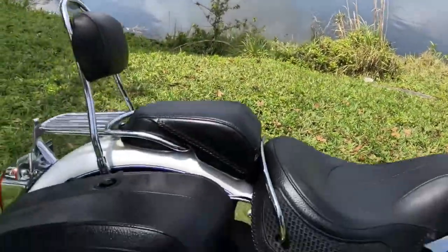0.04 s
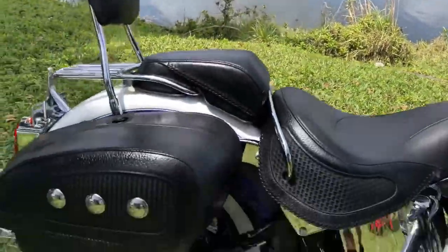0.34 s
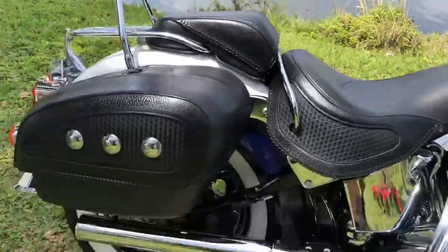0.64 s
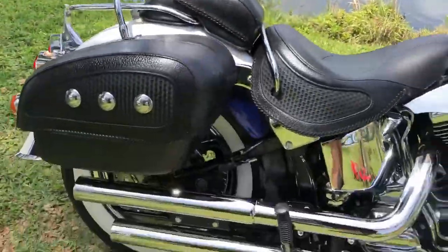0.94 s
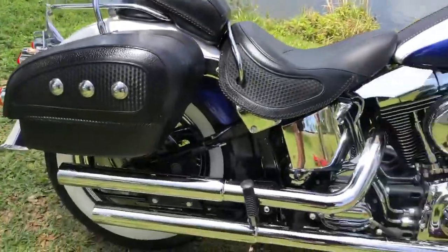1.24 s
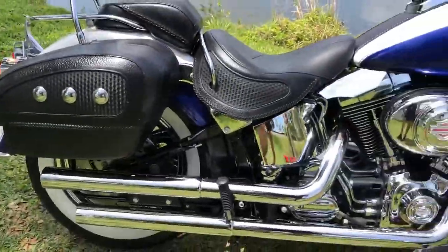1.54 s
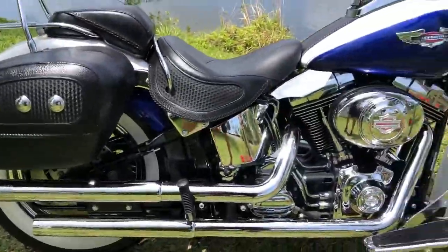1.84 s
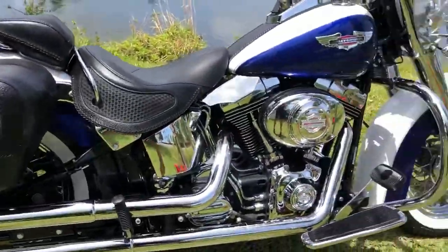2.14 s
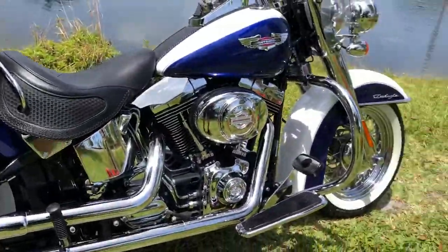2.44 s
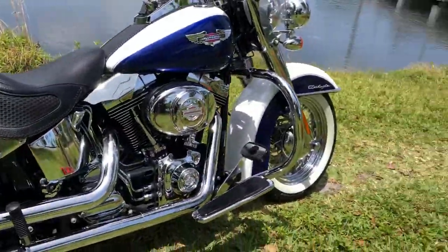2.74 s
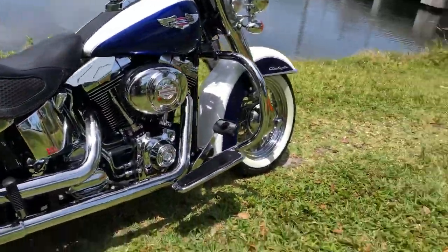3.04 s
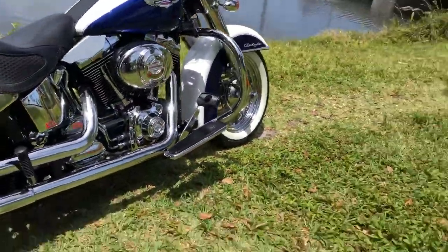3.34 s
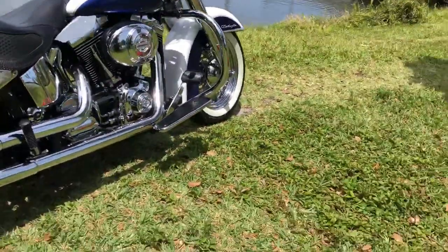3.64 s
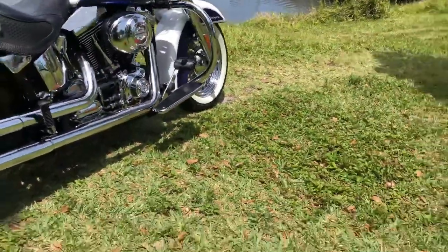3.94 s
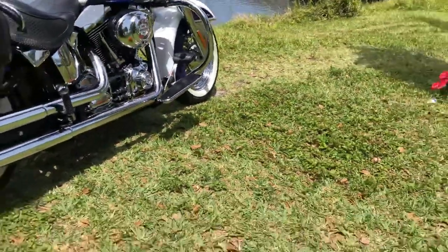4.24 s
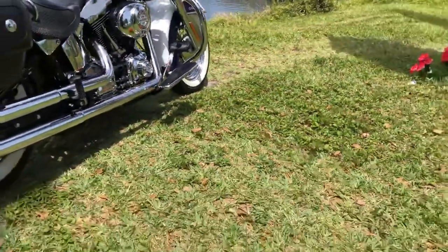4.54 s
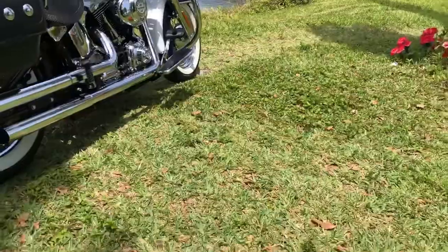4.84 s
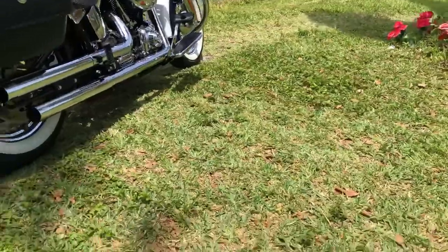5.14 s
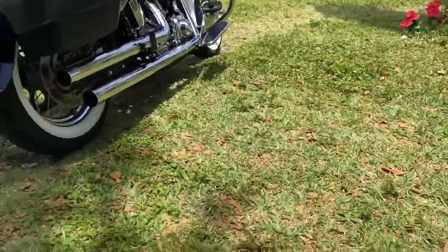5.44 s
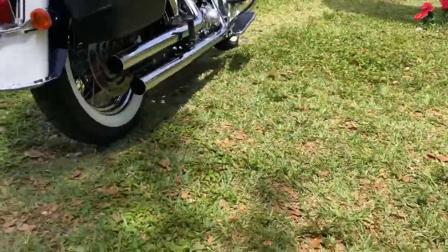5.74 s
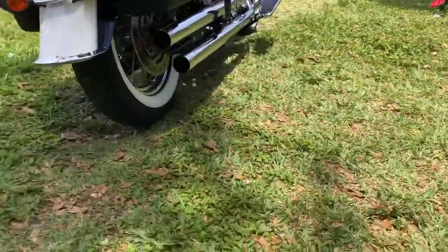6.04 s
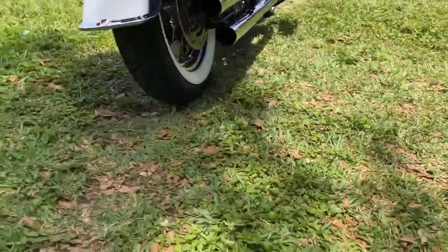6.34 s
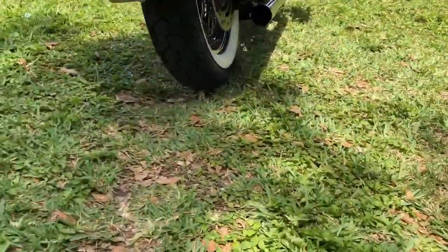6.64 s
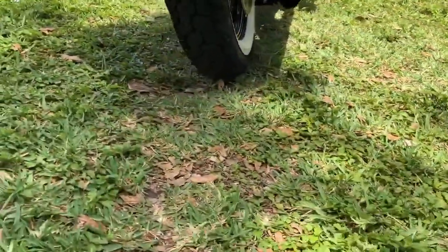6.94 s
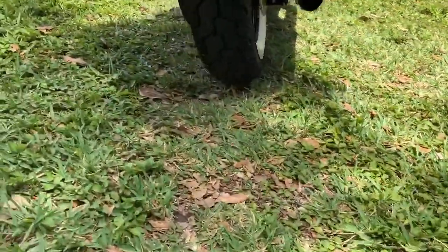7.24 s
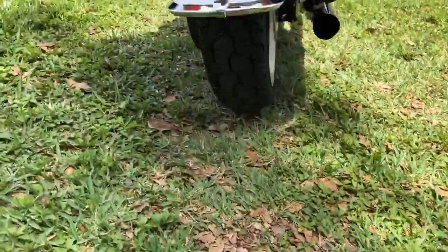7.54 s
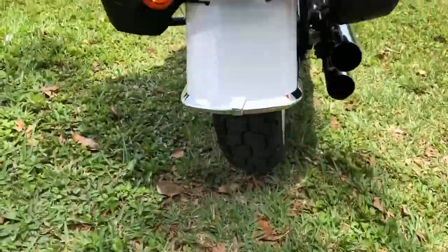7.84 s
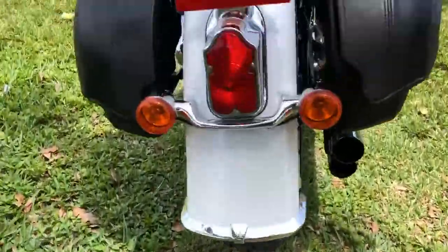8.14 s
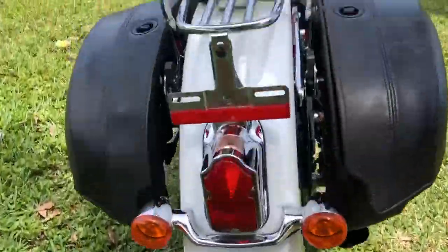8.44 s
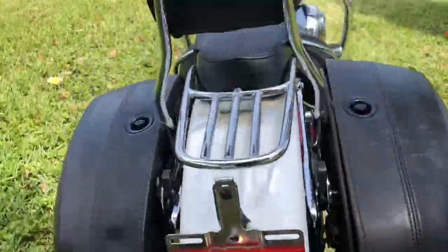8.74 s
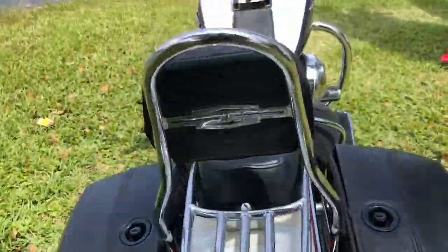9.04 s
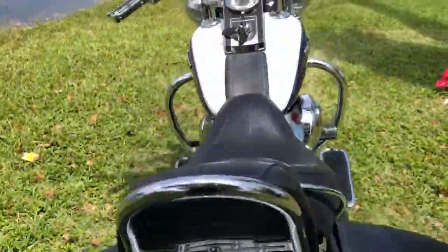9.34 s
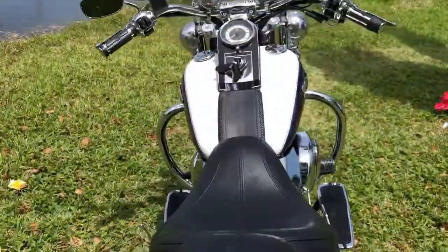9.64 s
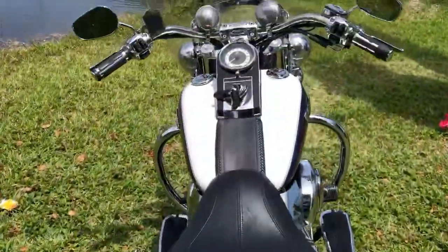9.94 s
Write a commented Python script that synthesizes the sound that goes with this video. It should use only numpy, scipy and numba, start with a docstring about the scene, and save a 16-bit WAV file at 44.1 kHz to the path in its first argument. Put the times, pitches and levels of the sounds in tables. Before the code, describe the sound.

Loud, uneven motorcycle exhaust booms and cracks, skipping beats as the engine slows to a throbbing idle with light mechanical clatter.

```python
"""An air-cooled V-twin motorcycle with two open pipes runs fast and ragged just after starting,
skips firings, then settles to a loping idle. Each firing sets its own pipe booming and throws out a
barking, cracking puff of gas. The valve gear clatters underneath and gulped air adds a hollow honk.
The microphone is carried over grass along the side of the bike, past the pipe mouths, where a rush
of exhaust brushes it, and up behind the seat."""
import sys
import numpy as np
from scipy import signal
from scipy.fft import rfft, irfft
from scipy.io import wavfile
from numba import njit

SR = 44100
rng = np.random.default_rng(int(sys.argv[2]) if len(sys.argv) > 2 else 0)


def store_pcm(level_fs):
    """Save levels as 16-bit WAV."""
    pcm = np.round(np.clip(level_fs, -1, 1) * 32767).astype(np.int16)
    wavfile.write(sys.argv[1], SR, np.atleast_2d(pcm).T)


N = 440559
TIME = np.arange(N) / SR


def undb(db):
    """Turn decibels into a number to multiply by."""
    return 10 ** (np.asarray(db) / 20)


def curve(rows):
    """Join a table's rows with straight lines in time, giving one curve for each value column."""
    seconds, *columns = np.transpose(rows)
    return [np.interp(TIME, seconds, column) for column in columns]


def levels_at(times, rows):
    """Look up a table's values at the given times, one row for each."""
    return np.transpose([np.interp(times, TIME, level) for level in curve(rows)])


def colour(x, points, size=2048):
    """Make some pitches stronger and others weaker; white noise keeps its overall power."""
    hz, db = np.transpose(points)
    freqs = np.maximum(np.arange(size // 2 + 1) * SR / size, 1)
    gains = undb(np.interp(np.log(freqs), np.log(hz), db))
    # these steps make the filter ring only after a sound, never before it
    cepstrum = irfft(np.log(gains))
    cepstrum[1:size // 2] *= 2
    cepstrum[size // 2 + 1:] = 0
    response = irfft(np.exp(rfft(cepstrum)))
    return signal.oaconvolve(x, response / np.linalg.norm(response))[:N]


def low_pass(order, hz):
    """Design a filter that dulls the sound above hz."""
    return signal.butter(order, hz, fs=SR, output="sos")


def resonance(x, hz, width_hz):
    """Ring at one pitch; a smaller width rings longer."""
    return signal.lfilter(*signal.iirpeak(hz, hz / width_hz, fs=SR), x)


@njit
def glide(x, hz, width_hz):
    """A resonance whose pitch and width move over time."""
    y, band, low = np.empty(len(x)), 0., 0.
    for i in range(len(x)):
        tuning, damping = np.tan(np.pi * hz[i] / SR), width_hz[i] / hz[i]
        ring = (band + tuning * (x[i] - low)) / (1 + tuning * (tuning + damping))
        band, low = 2 * ring - band, low + 2 * tuning * ring
        y[i] = damping * ring
    return y


def puffs(times, db, rise_s, hold_s, fall_s, tail_db, tail_s, patchy_db=0, size=4096):
    """Bursts of noise, each with its own tone: it swells, holds, collapses and leaves a weak tail."""
    t = TIME[:size]
    after = np.maximum(t - rise_s - hold_s, 0)
    tail = undb(tail_db) * np.exp(-after / tail_s)
    shape = np.minimum(t / rise_s, 1) * (np.exp(-after / fall_s) + tail)
    bumps = signal.resample(rng.standard_normal((len(times), 56)), size // 2, axis=1)
    spectra = rng.standard_normal((len(times), size)).view(complex) * undb(patchy_db * bumps)
    bursts = irfft(spectra, size) * shape
    bursts *= (undb(db) * np.linalg.norm(shape) / np.linalg.norm(bursts, axis=1))[:, None]
    out = np.zeros(N + size)
    for start, burst in zip(np.clip(times * SR, 0, N).astype(int), bursts):
        out[start:start + size] += burst
    return out[:N]


# The engine flares once, sinks, then wavers round its idle.
# Each row: time in seconds, turns per minute.
ENGINE_SPEED = [(0.0, 2206.6), (0.32, 1719.2), (0.58, 2451.0), (0.91, 1819.8), (1.44, 1326.7),
                (2.18, 1239.2), (3.03, 1269.2), (3.24, 1215.1), (3.68, 1312.6), (3.81, 1218.6),
                (4.43, 1182.3), (5.34, 1229.5), (5.53, 1162.5), (5.74, 1185.9), (6.01, 1108.0),
                (6.39, 1161.8), (6.8, 1110.2), (7.14, 1170.8), (7.86, 1090.1), (7.97, 1162.0),
                (8.14, 1106.5), (8.53, 1146.1), (8.6, 1121.2), (9.39, 1149.4), (9.64, 1035.7),
                (10.0, 1169.7)]
def speed_ratio(idle_rpm=1200):
    """How fast the engine turns: 1 is idle, 2 is twice as fast."""
    return curve(ENGINE_SPEED)[0] / idle_rpm


def crank_times(place, first_firing=.794):
    """When the crank passes a place (0 to 1) in its two-turn cycle; the front cylinder fires at 0."""
    cycles = np.cumsum(curve(ENGINE_SPEED)[0]) / (2 * 60 * SR) - first_firing - place
    return np.interp(np.arange(np.ceil(cycles[0]), cycles[-1]), cycles, TIME)


# The microphone's path. Each row: time in seconds, facing the pipe mouths from 0 to 1,
# delay of the ground echo in milliseconds.
WALK = [(0, 0.07, 0.67), (.9, 0.34, 1.1), (1.4, 0.25, 1.15), (2.3, 0.27, 1.66), (4.5, .47, 1.28),
        (5.5, 0.39, 1.8), (7.3, 1, 1.96), (8.5, .62, 1.34), (10, 0.36, 2.43)]
def facing_pipes():
    """Where the microphone is: 0 beside the bike, 1 straight behind the pipe mouths."""
    return curve(WALK)[0]


# Valves shutting. Each row: place in the cycle from 0 to 1, level in dB.
VALVES = [(0.281, -38.5), (.7, -35.5)]
# The ticks are clearer above the cylinder heads. Each row: time in seconds, boost in dB.
TICK_BOOST = [(0, -2), (3, -2.5), (8.4, -5), (9, 2), (10, 3)]
# The tone of a tick and of the whirr. Each row: pitch in Hz, relative level in dB.
TICK_TONE = [(800, -33), (1800, 6), (3000, 7), (3800, 1), (5500, -3), (8500, -16), (12000, -12),
             (15500, -22)]
WHIRR_TONE = [(25, -31), (100, -24), (250, 8.5), (400, -0.5), (700, 0.5), (1200, -6), (2000, -7),
              (3000, -10), (5000, -11), (7000, -14.5), (11000, -21.5), (15500, -29)]
# Cooling fins and rocker covers ring. Each row: pitch in Hz, width in Hz, boost in dB.
FIN_NOTES = [(461, 16, 10), (1193, 14, 16), (1400, 65, -1), (2925, 28, 3), (3800, 75, 0), (4860, 290, -4)]
def clatter(idle_db=-2, db_per_doubling=10, behind_db=-8):
    """Gears and chain whirr, valves tick shut, and both ring the fins; more speed is louder."""
    ticks = 0
    for place, db in VALVES:
        times = crank_times(place)
        ticks += puffs(times, db + 2 * rng.standard_normal(len(times)),
                       rise_s=.001, hold_s=.002, fall_s=.004, tail_db=-24, tail_s=.012, patchy_db=2)
    whirr = undb(-37.5) * colour(rng.standard_normal(N), WHIRR_TONE)
    shake = whirr + undb(curve(TICK_BOOST)[0]) * colour(ticks, TICK_TONE)
    fins = sum(undb(db) * resonance(shake, hz, width) for hz, width, db in FIN_NOTES)
    level_db = idle_db + db_per_doubling * np.log2(speed_ratio()) + behind_db * facing_pipes()
    return undb(level_db) * (shake + fins)


# An ordinary firing. Each row: time in seconds, then relative boom, bark and crack levels in dB.
FIRING_LEVELS = [(0, 0, -22.5, -29), (.3, -4, -22, -32), (.45, -5.5, -21.5, -20.5), (.6, -1.5, -16.5, -29),
                 (1, -1.5, -19, -29.5), (1.2, -2.5, -17.5, -25.5), (2.5, -1, -19, -24.5),
                 (3.7, 1, -19.5, -23.5), (4.2, 0, -27, -19.5), (4.7, 1.5, -23, -18), (5.5, 1.5, -21, -14),
                 (6.3, 3, -23.5, -11), (7.2, 3.5, -25.5, -14.5), (8.45, 4.5, -23.5, -10.5),
                 (8.9, 4.5, -19.5, -17), (10, 3, -30, -33)]
# Added for the rear pipe. Each row: time in seconds, then boom, bark and crack changes in dB.
REAR_CHANGES = [(0, -0.5, 3, -5), (1.5, -3.5, -1, -3.5), (7, -4, 1.5, -1.5), (9, -5, -2, 1),
                (10, -7, -2.5, 3.5)]
# Weak firings (nearly all in the rear cylinder) and hard ones (most while the engine races).
# Each row: time in seconds, boom change in dB, gas noise change in dB.
MISFIRES = [(.05, -16, -0.5), (.59, -4, -13), (.608, -0.5, 0), (.655, -15, -5), (.8, -9, -2),
            (.925, -8, -8), (1.016, -6, -20), (1.06, -6, -9), (1.24, -2.5, -8), (1.41, -6, -16),
            (1.59, -8, -29), (1.775, -4, -7), (2.06, -11, -19), (2.25, -8, -22), (2.44, 0, -6.5),
            (3.11, -7, -22), (3.4, -13, -34), (3.59, -6, -21), (3.78, -9, -13), (3.975, -5.5, -23),
            (4.17, -6, -17.5), (4.58, -8, -22), (4.78, -1.5, -7), (4.98, -9, -37), (5.18, -9, -20),
            (5.37, -7, -15.5), (8.11, -2, -25), (8.53, -3, -7), (8.745, -6.5, -22)]
BANGS = [(.096, 0, 6), (.185, 0, 7), (.22, 3, 6), (.357, 4, 5), (.386, 4.5, 8.5), (.422, 2, 9.5),
         (.447, 2.5, 6.5), (.477, 4, 7), (.5, 5.5, 4), (.627, 1.5, 3), (.687, 0, 0.5), (.736, -4, 3),
         (.855, 3, 4.5), (1.162, -1.5, 3.5), (2.4, 2, 3), (4.275, 3, 5.5), (4.68, 2, 5.5), (8.91, 0, -0.5)]
def cylinder_firings(rear_lag_cycles=.428, idle_jitter_s=.0003, bark_share=.83):
    """List front and rear firings. Each row: start in seconds, then boom, bark and crack in dB."""
    front, rear = crank_times(0), crank_times(rear_lag_cycles)
    times = np.concatenate([front, rear])
    chance = rng.standard_normal((len(times), 4))
    scatter_db = np.array([.5, 1.6, .9])  # boom, bark, crack
    db = levels_at(times, FIRING_LEVELS) + scatter_db * chance[:, 1:]
    db[len(front):] += levels_at(rear, REAR_CHANGES)
    for when, boom_db, gas_db in MISFIRES + BANGS:
        nearest = np.argmin(abs(times - when))
        db[nearest] += boom_db, bark_share * gas_db, gas_db
    # the faster the cold engine runs, the more unevenly it fires
    ragged = np.interp(times, TIME, speed_ratio()) ** 3.6
    starts = times + idle_jitter_s * ragged * chance[:, 0]
    return np.split(np.column_stack([starts, db]), [len(front)])


# The notes of the air in each pipe. Each row: pitch at idle in Hz, width at idle in Hz,
# boost in dB, direction of the swing at the mouth (1 or -1).
FRONT_PIPE = [(70.27, 26.87, 19.5, 1), (77.2, 54.46, 18, -1), (95.9, 17.3, 5, 1), (144.54, 46.7, 13.5, 1),
              (153.24, 29.3, 11, -1)]
REAR_PIPE = [(74.33, 27.45, 17, 1), (75.5, 14.9, 20, -1), (132.6, 16.5, 4, -1), (168.3, 5.2, 3, 1),
             (221.2, 30.14, 11.5, -1), (221.5, 23.6, 13, 1)]
def boom(firings, notes, lead_s, gain_db):
    """The opening valve pushes the air in the pipe, which rings at its own low notes."""
    times, boom_db, _, _ = np.transpose(firings)
    starts = np.clip((times - lead_s) * SR, 0, N - 1).astype(int)
    kicks = np.bincount(starts, undb(boom_db + gain_db), N)
    # the valve lifts gradually, so the push is soft
    push = signal.sosfiltfilt(low_pass(2, hz=700), kicks, padtype=None)
    heat = speed_ratio() ** .234  # faster running heats the gas, which raises the notes
    return sum(sign * undb(db) * glide(push, hz * heat, width * heat) for hz, width, db, sign in notes)


# The tone of the gas noises, with bark and crack heard from the side and from behind the pipes.
# Each row: pitch in Hz, relative level in dB.
GROWL_TONE = [(30, -61), (90, -16.5), (170, 3), (235, 3.5), (300, -4), (400, -14.5), (600, -12),
              (1000, -13), (2500, -54)]
BARK_SIDE = [(200, 10.5), (380, -5), (520, -1), (720, 5), (950, 6), (1200, -0.5), (1450, -1), (1950, 2),
             (2400, -10), (3200, -17), (6000, -15.5), (14000, -16.5)]
BARK_BEHIND = [(200, -4.5), (380, -17), (520, 12), (720, -0.5), (1050, 8), (1300, 4), (1600, 9), (2100, 0),
               (3200, -5), (6000, -25)]
CRACK_SIDE = [(1000, -58.5), (2000, 2), (2900, 8), (4000, 6.5), (5200, 1.5), (6500, -2), (9000, 3.5),
              (12000, -0.5), (15500, -9.5)]
CRACK_BEHIND = [(1000, -10), (2400, -10), (3400, 2), (4500, 1.5), (6500, 1), (9000, 1), (10500, -2.5),
                (12500, -7), (15500, -15)]
# The bark's strongest ring along the way. Each row: time in seconds, pitch in Hz, boost in dB.
BARK_RING = [(0, 970, -16), (.5, 1240, 9.5), (.75, 1460, 7), (1.3, 1190, 3.5), (2.3, 1196, 6.5),
             (3.5, 1110, -21), (4.3, 1780, 5.5), (4.9, 1650, 2), (5.6, 1340, -1), (7.4, 1050, -23),
             (8.8, 970, -3), (9.5, 1180, 9.5)]
# The low growl and the highest fizz rise and fall. Each row: time in seconds, boost in dB.
GROWL_BOOST = [(0, -2), (3.2, -7.5), (4.1, -0.5), (5.5, -2), (8.15, 3.5), (8.5, -12.5), (10, -6)]
FIZZ_BOOST = [(0, -10), (.8, -5.5), (2.3, 0.5), (3.5, 0), (4.7, -1.5), (5.5, -4), (7.3, 3), (8.15, -1.5),
              (8.5, -12), (10, 1)]
def gas_jet(firings, bark_db, crack_db, snap_db):
    """Gas shoots from one pipe: a low growl, a bark and a bright crack that beams out of the mouth."""
    times, booms, barks, cracks = np.transpose(firings)
    growl = puffs(times, (booms + barks) / 2 - 17,
                  rise_s=.0045, hold_s=.018, fall_s=.058, tail_db=-13, tail_s=.041)
    bark = puffs(times - .001, barks + bark_db,
                 rise_s=.00075, hold_s=.0032, fall_s=.011, tail_db=-6.5, tail_s=.009, patchy_db=3.5)
    # out of the mouth the bark swells later and rattles on in the pipe
    rattle = puffs(times, barks + bark_db,
                   rise_s=.0034, hold_s=.0031, fall_s=.0055, tail_db=-4.5, tail_s=.026, patchy_db=2.5)
    # from the side the crack arrives smeared; straight behind it is a tight snap
    crack = puffs(times - .0007, cracks + crack_db,
                  rise_s=.002, hold_s=.0028, fall_s=.0028, tail_db=-14, tail_s=.01, patchy_db=2.8)
    snap = puffs(times - .0004, cracks + snap_db,
                 rise_s=.0015, hold_s=.0019, fall_s=.0013, tail_db=-19, tail_s=.009, patchy_db=2.4)
    # the pressure wave runs back up the pipe and returns with a second, weak spit
    spit = puffs(times + .014, cracks - 21,
                 rise_s=.003, hold_s=.003, fall_s=.005, tail_db=-16, tail_s=.01, patchy_db=2)
    side = colour(bark, BARK_SIDE) + colour(crack, CRACK_SIDE)
    behind = colour(rattle, BARK_BEHIND) + colour(snap, CRACK_BEHIND) + colour(spit, CRACK_SIDE)
    facing = facing_pipes()
    jet = (1 - facing) * side + facing * behind
    ring_hz, ring_db = curve(BARK_RING)
    jet += undb(ring_db) * glide(jet, ring_hz, .13 * ring_hz)
    # the highest pitches form a narrow beam, easily blocked by the saddlebags
    body = signal.sosfiltfilt(low_pass(2, hz=7000), jet)
    fizz = undb(curve(FIZZ_BOOST)[0]) * (jet - body)
    return body + fizz + undb(curve(GROWL_BOOST)[0]) * colour(growl, GROWL_TONE)


# The honk shifts as the microphone passes the air cleaner and the pipe mouths.
# Each row: time in seconds, pitch in Hz, width in Hz, level in dB.
HONK = [(0, 900, 300, -57), (1.2, 920, 300, -47), (2.3, 720, 140, -33), (3.7, 675, 59.7, -34.5),
        (4.5, 617, 120, -39), (5.3, 500, 310, -45.5), (7.4, 480, 410, -44), (8.1, 565, 403, -30.5),
        (8.5, 607, 202, -33.5), (10, 636, 150, -42)]
def honk(firings):
    """The air that each cylinder gulps and pushes out sounds one hollow note."""
    times, booms, _, _ = np.transpose(firings)
    hz, width_hz, db = curve(HONK)
    gulps = puffs(times, booms / 2, rise_s=.003, hold_s=.012, fall_s=.022, tail_db=-10, tail_s=.05)
    note = glide(glide(gulps, hz, width_hz), hz, 2 * width_hz) / np.sqrt(width_hz)
    return undb(db) * note / np.sqrt(np.mean(note ** 2))


def ground_echo(x, share=.17):
    """The lawn adds a dull copy whose delay changes as the microphone moves."""
    delay_s = curve(WALK)[1] / 1000
    dull = signal.sosfilt(low_pass(1, hz=2000), x)
    return x + share * np.interp(TIME - delay_s, TIME, dull)


def hollow(x, depth=.27):
    """Away from the pipe mouths, a narrow band of pitches between boom and bark gets quieter."""
    aside = 1 - facing_pipes() ** 2
    return x - depth * aside * resonance(x, hz=350, width_hz=60)


def shrub_echo(x, echo_db=-24, delay_s=.02, decay_s=.012):
    """Shrubs and the far bank scatter back a faint, dull tail."""
    t = TIME[:SR // 2]
    tail = rng.standard_normal(len(t)) * np.exp(-t / decay_s) * (t > delay_s)
    echo = signal.oaconvolve(x, tail / np.linalg.norm(tail))[:N]
    return x + undb(echo_db) * signal.sosfilt(low_pass(1, hz=2000), echo)


# The microphone crosses the line of the pipes. Each row: start in seconds, level in dB.
GUSTS = [(8.115, -24)]
# The tone of the rush. Each row: pitch in Hz, relative level in dB.
GUST_TONE = [(60, -15), (250, 0), (550, -1), (1200, -7), (1800, -19), (4000, -37), (12000, -55)]
def exhaust_gust():
    """The exhaust stream brushes the microphone: a dull rush that swells and stops."""
    times, db = np.transpose(GUSTS)
    rush = puffs(times, db, rise_s=.036, hold_s=.016, fall_s=.008, tail_db=-20, tail_s=.01)
    return colour(rush, GUST_TONE)


def scene():
    """Mix both pipes and the engine, outdoors, into one channel."""
    front, rear = cylinder_firings()
    booms = boom(front, FRONT_PIPE, lead_s=-.0007, gain_db=34)
    booms += boom(rear, REAR_PIPE, lead_s=.004, gain_db=37.5)
    jets = gas_jet(front, bark_db=-1, crack_db=1.5, snap_db=1)
    jets += gas_jet(rear, bark_db=-3.5, crack_db=3.5, snap_db=0)
    bike = booms + ground_echo(jets + clatter()) + honk(np.vstack([front, rear]))
    return (shrub_echo(hollow(bike)) + exhaust_gust())[None]


def record(dry):
    """Cut the deepest rumble, round off the loudest peaks and cut the highest treble."""
    rumble_hz, ceiling, top_hz = 36, .76, 15900
    rumble_cut = signal.butter(2, rumble_hz, "high", fs=SR, output="sos")
    lean = dry
    for _ in range(3):  # three passes make the cut steep
        lean = signal.sosfilt(rumble_cut, lean)
    rounded = lean / (1 + (lean / ceiling) ** 8) ** (1 / 8)
    return signal.sosfiltfilt(signal.ellip(8, .1, 50, top_hz, fs=SR, output="sos"), rounded)


dry = scene()
out = record(dry)
store_pcm(out)
```